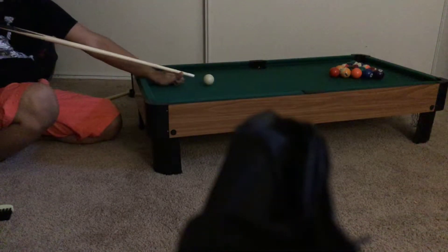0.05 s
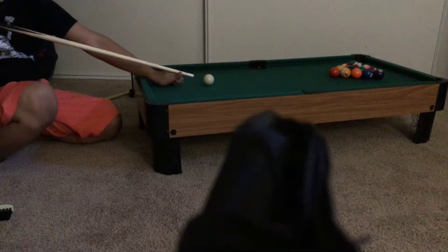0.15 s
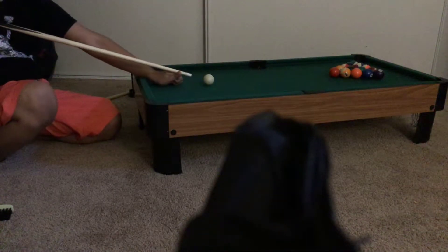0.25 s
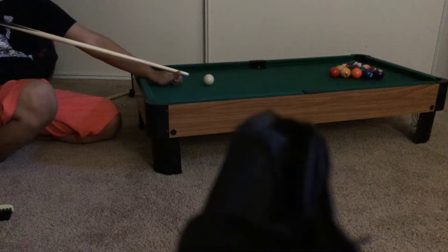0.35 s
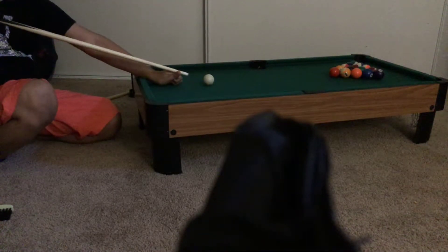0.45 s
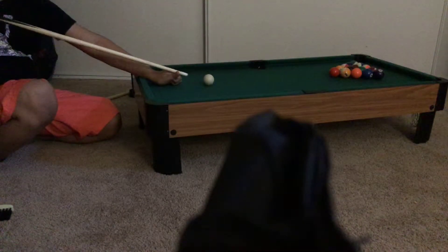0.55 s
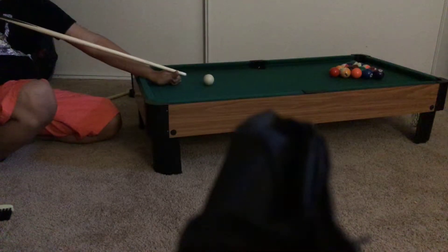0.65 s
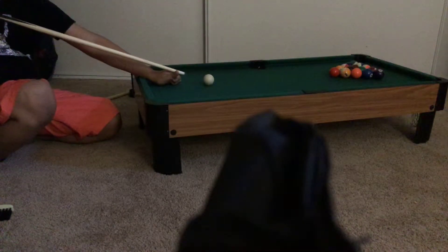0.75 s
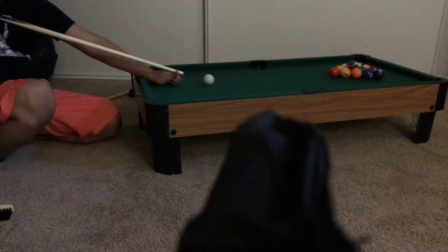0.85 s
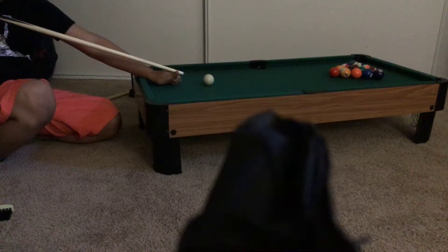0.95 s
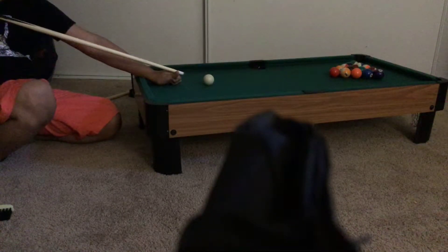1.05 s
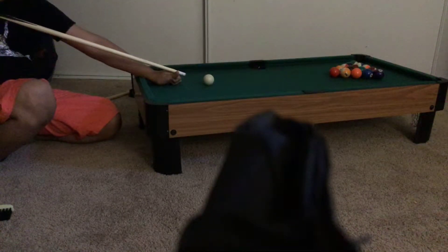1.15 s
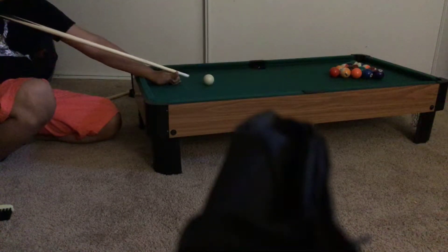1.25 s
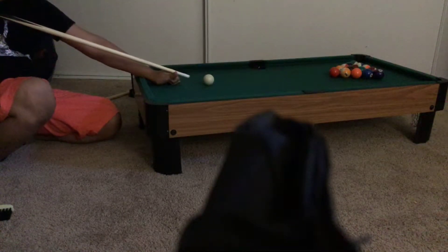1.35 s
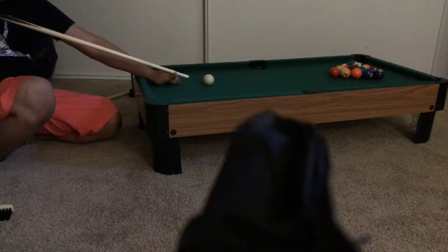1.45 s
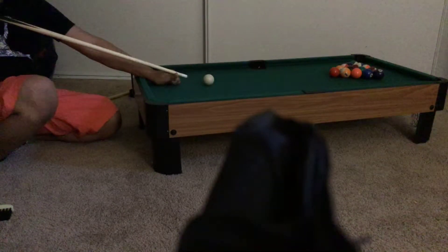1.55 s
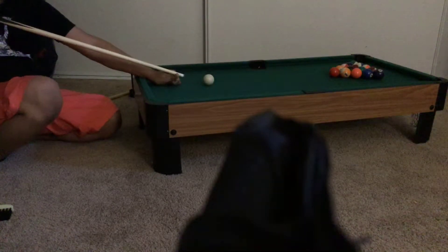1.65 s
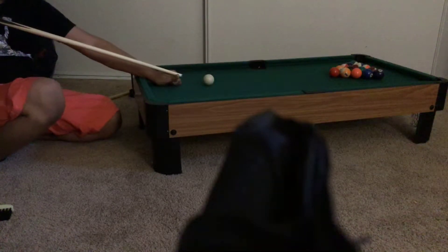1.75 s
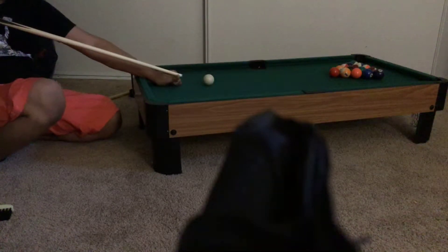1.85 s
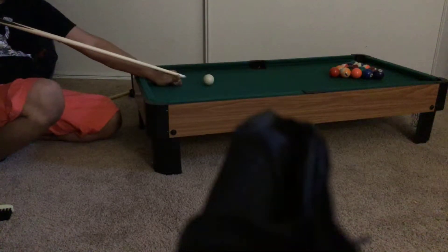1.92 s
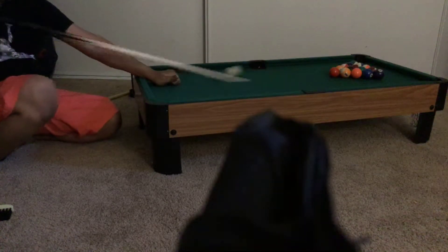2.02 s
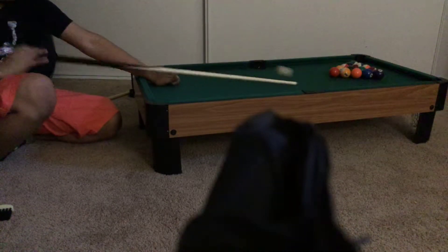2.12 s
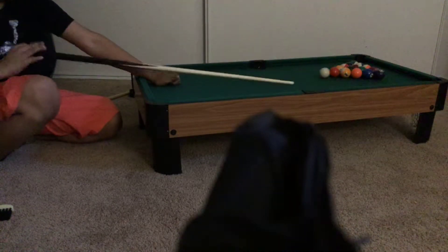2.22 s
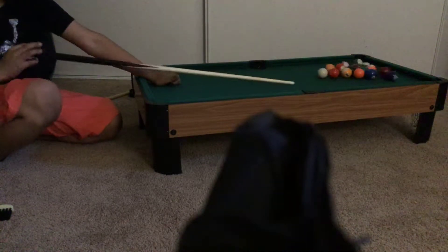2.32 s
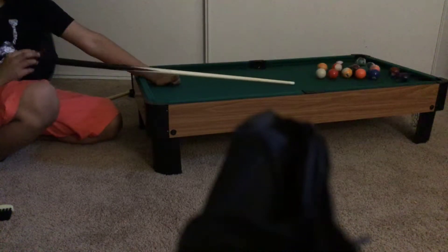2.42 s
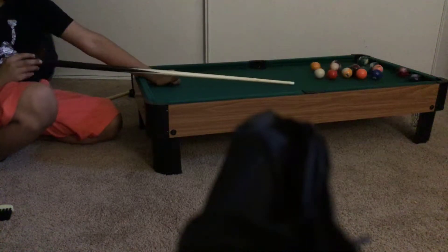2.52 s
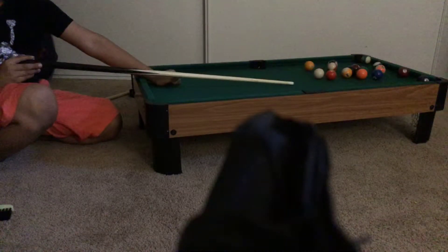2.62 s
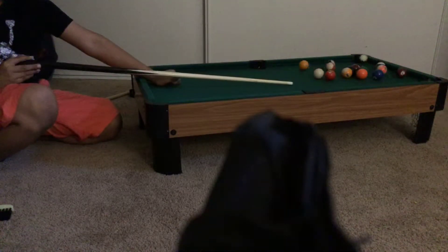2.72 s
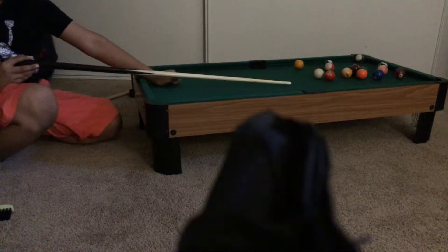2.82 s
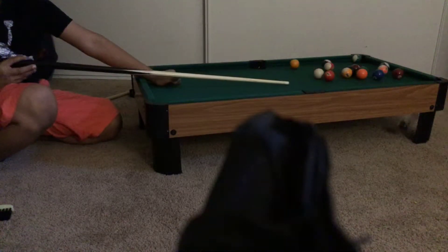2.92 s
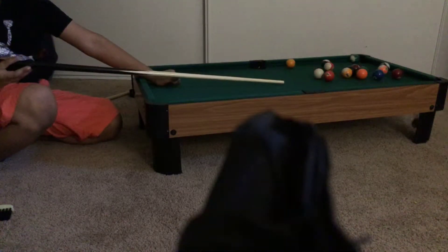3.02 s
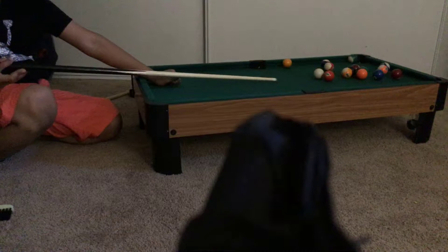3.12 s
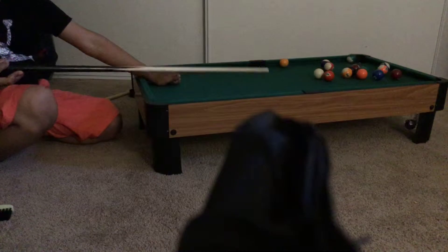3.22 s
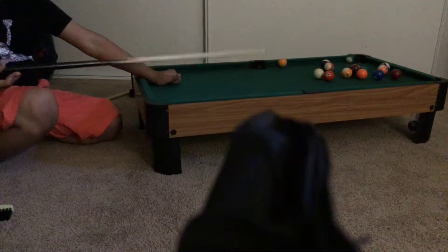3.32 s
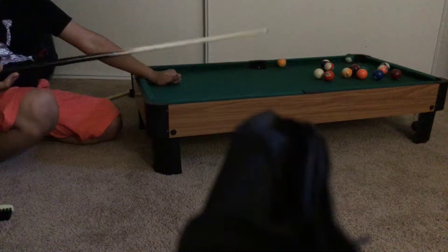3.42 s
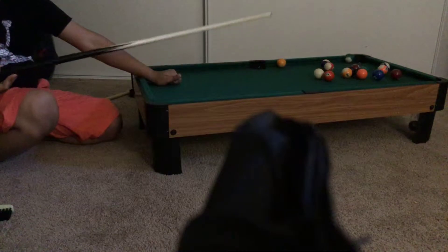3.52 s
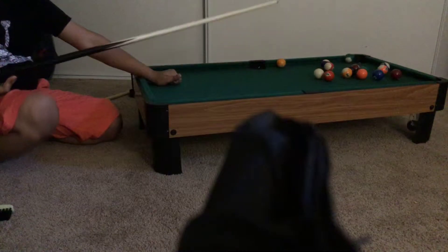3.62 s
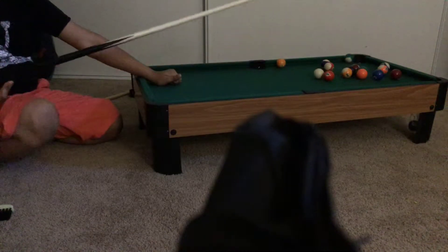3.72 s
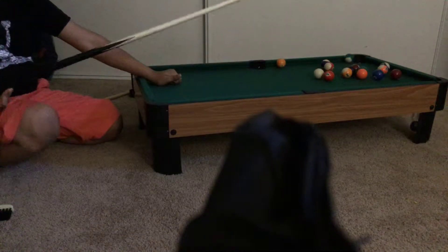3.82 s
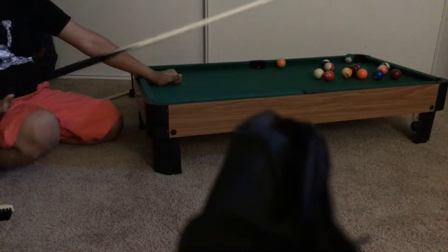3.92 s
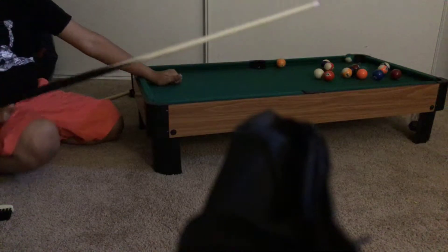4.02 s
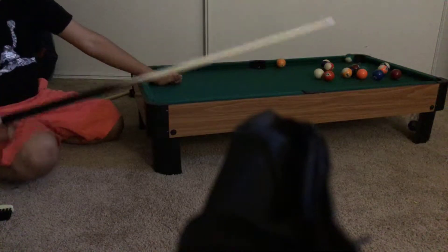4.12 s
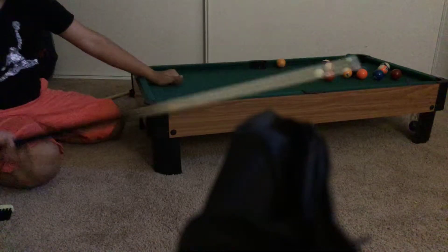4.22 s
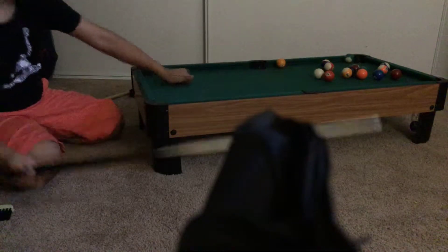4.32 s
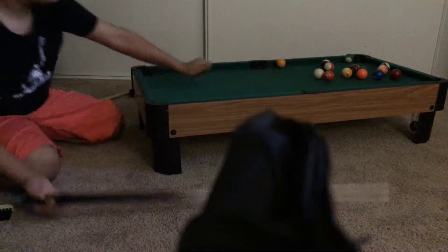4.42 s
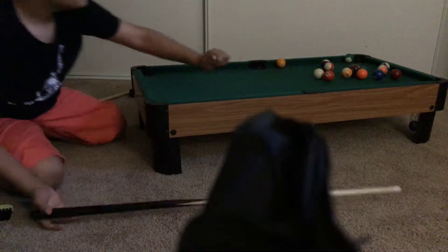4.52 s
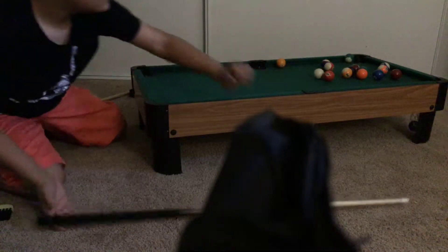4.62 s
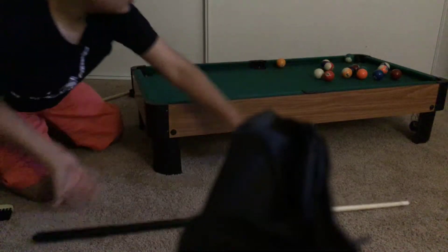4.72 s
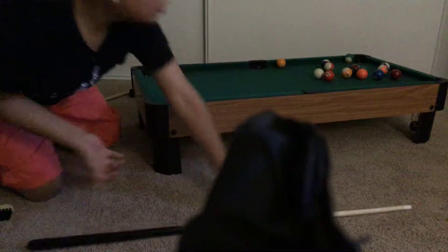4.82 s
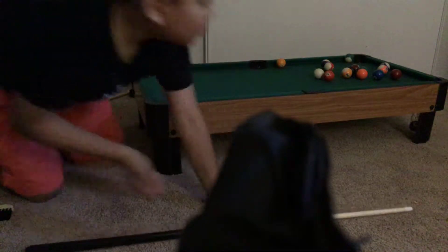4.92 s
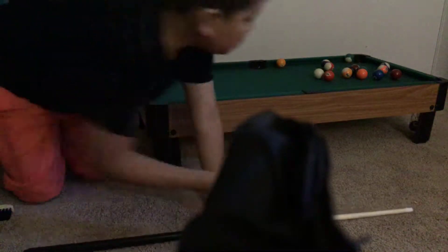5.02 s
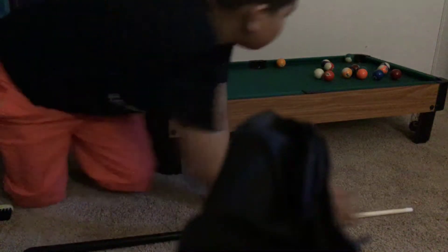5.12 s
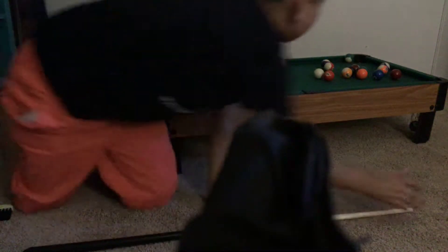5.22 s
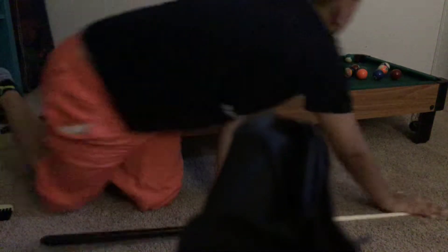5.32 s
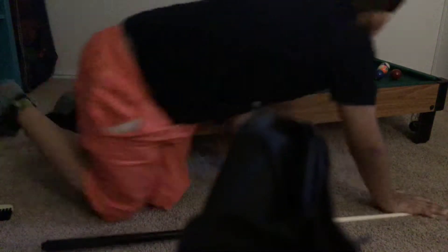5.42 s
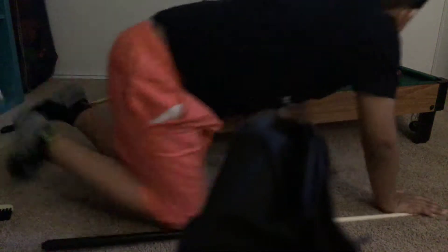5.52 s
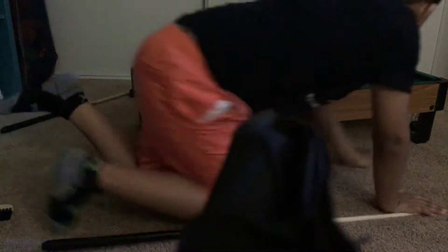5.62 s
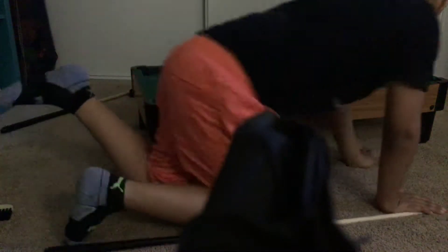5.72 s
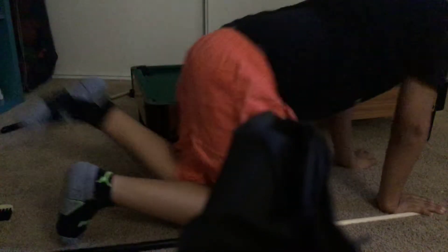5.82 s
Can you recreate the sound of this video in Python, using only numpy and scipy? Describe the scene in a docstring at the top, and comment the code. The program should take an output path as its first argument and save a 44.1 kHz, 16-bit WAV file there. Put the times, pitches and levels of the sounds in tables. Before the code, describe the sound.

Nearly two seconds of hushed indoor air, then a loud, bright cue strike with a boxy table knock, answered a quarter second later by hard, dense ball clacks. Balls roll faintly on felt and knock the wooden rails. Afterwards come quiet fabric swishes, a soft cue drop, tiny faint squeaks and a cluster of dull carpet thuds. Mono, small microphone close to the floor, slightly reverberant room, little deep bass.

```python
"""In a quiet room with air noise and a building rumble, cloth rustles: rubbing noise swelling per movement.
A cue strikes the white ball on a small wooden pool table: a tip snap and dying shaft modes. The table
thumps and knocks as its box modes ring, and racked balls clack as short air pulses; rolling balls rub
the felt. Then the player drops the cue on the carpet and crawls forward: low damped thuds, rustling
cloth, and faint squeaks of narrow-band noise."""
import sys
import numpy as np
from scipy import signal
from scipy.io import wavfile
from scipy.ndimage import uniform_filter1d

SR = 44100
rng = np.random.default_rng(int(sys.argv[2]) if len(sys.argv) > 2 else 0)


def dump_mix(stems):
    """Bounce the given channels to the path in sys.argv[1] as a 16-bit WAV at rate SR."""
    frames = np.atleast_2d(stems).T  # one column per channel
    limited = np.clip(frames, -1, 1)  # hard clip at full scale
    pcm = np.round(limited * 32767).astype(np.int16)
    wavfile.write(sys.argv[1], SR, pcm)


N = 258426


def gain_of(db):
    """Level law: decibels to an amplitude ratio."""
    return 10 ** (np.asarray(db) / 20)


def read(points, hz):
    """Interpolation along a logarithmic frequency axis."""
    point_hz, value = np.transpose(points)
    return np.interp(np.log(hz + 1), np.log(point_hz + 1), value)


def peaked(x):
    """Normalisation to a peak of 1."""
    return x / np.max(abs(x))


def add(mix, start_s, sound):
    """Superposition: a sound is summed in place from its start time."""
    part = mix[round(start_s * SR):][:len(sound)]
    part += sound[:len(part)]


def ring(modes, weight, rise_s):
    """Modal superposition: dying sines swell with a contact time constant; neighbours swing opposite ways."""
    t = np.arange(SR // 2) / SR
    hz, level_db, t60_s = np.transpose(modes)[:, :, None]
    sign = (-1.) ** np.arange(len(modes))[:, None]
    decay = gain_of(level_db - 60 * t / t60_s)
    sines = weight * sign * decay * np.sin(2 * np.pi * hz * t)
    return peaked(sines.sum(0) * (1 - np.exp(-t / rise_s)))


def colour(points):
    """Minimum phase: a causal impulse whose phase follows from its log spectrum."""
    spectrum_db = np.maximum(read(points, np.fft.rfftfreq(4096, 1 / SR)), -100)
    half = np.log(gain_of(spectrum_db))
    full = np.r_[half, half[-2:0:-1]]  # both sides of the spectrum
    return np.fft.ifft(np.exp(np.conj(signal.hilbert(full)))).real[:1024]


def burst(t60_s):
    """Exponential decay of 18 ms of white noise."""
    samples = np.arange(800)
    return rng.standard_normal(800) * gain_of(-60 * samples / SR / t60_s)


def noise(points, patchy_db, size=1024):
    """Short-time synthesis: random spectra with drifting patches of level, rms 1."""
    frames, hz = 4 * N // size + 5, np.fft.rfftfreq(size, 1 / SR)
    real, imag, patches = rng.standard_normal((frames, len(hz), 3)).T
    patches = uniform_filter1d(patches, size=8, axis=0)   # smooth across frequency
    patches = uniform_filter1d(patches, size=10, axis=1)  # smooth along time
    level_db = read(points, hz)[:, None] + patchy_db * patches / patches.std()
    spectra = (real + 1j * imag) * gain_of(level_db)
    x = signal.istft(spectra, nperseg=size, noverlap=size - size // 4)[1][:N]
    return x / x.std()


# spectrum of the room air: pitch_hz [Hz], relative level_db [dB per Hz]
AIR_SPECTRUM = [(180, -30.5), (300, -5), (486, -6), (737, -4.5), (915, -24.5), (1170, -12.5), (1660, -19.5),
                (2070, -17.5), (3640, -27.5), (15000, -44.5), (16000, -50)]
# spectrum of the building rumble: pitch_hz [Hz], relative level_db [dB per Hz]
RUMBLE_SPECTRUM = [(18, -64.5), (30, -28), (46, -16), (70, 5), (102, -2), (119, -5.5), (141, -2),
                   (162, -10), (192, -0.5), (217, -25), (242, -15), (278, -16), (330, -11), (430, -43),
                   (730, -120)]


def room_tone():
    """Stationary noise: room air plus low building rumble, each at a fixed rms level."""
    air_db, rumble_db = -64.5, -54.5
    air = gain_of(air_db) * noise(AIR_SPECTRUM, 1.3)
    rumble = gain_of(rumble_db) * noise(RUMBLE_SPECTRUM, 0.53, size=4096)
    return air + rumble


def swell(top_s, length_s):
    """Asymmetric Gaussian bell of power, rising faster than it falls; length between its 1/e^2 points."""
    t = np.arange(N) / SR - top_s
    rise_share = 0.44  # part of a movement spent swelling
    share = np.where(t < 0, rise_share, 1 - rise_share)
    return np.exp(-2 * (t / length_s / share) ** 2)


# player shifting, stroking, dropping the cue and crawling:
# top_s [s], length_s [s], cloth swish_db [dB], fine fabric hiss_db [dB]
RUSTLE_MOVES = [(0.034, 0.19, -68.5, -74.5), (1.35, .2, -93, -85), (1.71, 0.15, -79, -86),
                (2.086, 0.17, -73, -78), (3.333, .22, -86, -87), (3.764, .15, -77, -82),
                (3.92, .18, -78.5, -85), (4.22, .15, -75.5, -84), (4.416, 0.17, -68, -75.5),
                (4.68, 0.33, -63.5, -76), (5.09, 0.42, -65, -78), (5.36, 0.18, -66, -75),
                (5.453, 0.11, -59.5, -62), (5.513, .1, -65.5, -84), (5.59, 0.12, -63.5, -68.5),
                (5.664, 0.15, -63, -72), (5.83, 0.22, -66, -71)]
# a player keeping still: drag_db, swish_db, hiss_db [dB]
STILL_LEVELS = (-61, -87, -100)
# balls rolling over the felt: top_s [s], length_s [s], drag_db, swish_db, hiss_db [dB]
FELT_ROLL = (3, 0.85, -64.5, -72, -82.5)
# spectra of rubbing, low drag, cloth swish, fine hiss: pitch_hz [Hz], relative level_db [dB per Hz]
DRAG_SPECTRUM = [(60, -32.5), (150, 11.5), (300, 1.5), (700, -3.5), (1200, -14), (2500, -48.5)]
SWISH_SPECTRUM = [(500, -32), (900, -6.5), (1500, -6), (2500, -7), (4000, -11), (6500, -17.5), (9000, -28),
                  (12000, -53.5)]
FINE_SPECTRUM = [(4410, -44), (7500, -9.5), (8650, -15.5), (9390, -4.5), (13400, -1.5), (14700, 3.5),
                 (16000, -5.5)]


def moves():
    """Friction noise: powers of movements and rolling add; fibres catch, so swish and hiss flicker."""
    drag_over_swish_db = 6  # limbs drag along with the cloth
    still_power = gain_of(STILL_LEVELS)[:, None] ** 2
    roll_power = gain_of(FELT_ROLL[2:])[:, None] ** 2 * swell(*FELT_ROLL[:2])
    power = still_power + roll_power
    for top_s, length_s, swish_db, hiss_db in RUSTLE_MOVES:
        levels_db = [[swish_db + drag_over_swish_db], [swish_db], [hiss_db]]
        power = power + gain_of(levels_db) ** 2 * swell(top_s, length_s)
    catch = uniform_filter1d(rng.standard_normal(N), size=300)
    catch = gain_of(1.5 * catch / catch.std())
    drag = noise(DRAG_SPECTRUM, 2.5)
    swish = catch * noise(SWISH_SPECTRUM, 0.77)
    hiss = catch * noise(FINE_SPECTRUM, 1.4, size=256)
    return (np.sqrt(power) * (drag, swish, hiss)).sum(0)


# cue tip meeting the ball, then the shaft chattering:
# start_s [s], level_db [dB, reference for the layers below]
CUE_HITS = [(2.1085, -14), (2.1129, -20), (2.1325, -28.5)]
# modes of the cue stick: pitch_hz [Hz], relative level_db [dB], t60_s [s]
SHAFT_MODES = [(1600, -3.5, 0.052), (2038, -2, 0.03), (2620, -1, 0.035), (3268, -1.5, 0.025),
               (3540, -7.5, 0.032), (4257, -15, .03), (4887, -3, 0.023), (5030, -6.5, 0.045),
               (6290, -11, 0.027)]
# snap of the tip: pitch_hz [Hz], relative level_db [dB per Hz]
TIP_SPECTRUM = [(500, -44), (1000, -16.5), (2000, -4.5), (3000, 3), (5000, -5.5), (7000, -12), (9500, -22),
                (13000, -21.5), (16000, -27.5)]


def cue():
    """Impact excitation: the tip snaps, the shaft rings at its modes, and the tip's leather scuffs on."""
    stick, scuff = np.zeros((2, N))
    snap = peaked(colour(TIP_SPECTRUM))
    for start_s, level_db in CUE_HITS:
        add(stick, start_s, gain_of(level_db - 0.5) * snap)
        add(stick, start_s, gain_of(level_db - 10.0) * ring(SHAFT_MODES, 1, 0.00032))
        add(scuff, start_s, gain_of(level_db - 6.0) * peaked(np.convolve(burst(0.03), snap)))
    return stick, scuff


# decay of the room: pitch_hz [Hz], t60_s [s]
WALL_DECAY = [(150, .35), (400, 0.25), (1000, 0.29), (3000, 0.29), (7000, 0.33), (14000, 0.15)]


def room(x):
    """Reverberation: sparse taps of random sign, each band dying at its own speed, total energy 1."""
    taps = np.zeros(SR // 2)
    at = np.arange(120, len(taps) - 20, 20)
    taps[at + rng.integers(0, 20, len(at))] = rng.choice([-1., 1.], len(at))
    hz, t, bands = signal.stft(taps, SR, nperseg=256)
    decay = gain_of(-60 * t / read(WALL_DECAY, hz)[:, None])
    tail = signal.istft(bands * decay, SR, nperseg=256)[1]
    return signal.fftconvolve(x, tail / np.linalg.norm(tail))[:N]


# parts of the knocks on the table, several rows may form one knock:
# start_s [s], peak level_db [dB], pitch_hz at the centre of the modes set ringing [Hz],
# spread [octaves], lasting [factor on ring time], crack_db [dB relative to level_db]
KNOCK_PARTS = [(2.113, -12.5, 240, 0.52, 0.46, -9), (2.114, -13, 353, 0.18, 0.36, -23.5),
               (2.143, -18.5, 357, 0.44, 1.4, -23), (2.150, -25, 230, .4, 0.89, -10.5),
               (2.279, -16, 222, 0.31, 0.3, 2), (2.288, -16.5, 487.6, .25, 0.56, -10.5),
               (2.325, -23.5, 216, 0.43, 1.4, -10), (2.704, -41, 211.5, 0.81, 1.5, -17),
               (2.9003, -25.5, 743, 0.53, 0.46, 2.5), (2.907, -22, 355, 0.46, 0.63, -12),
               (2.914, -23.5, 470, 0.64, 0.86, -17), (3.161, -27.5, 238, 0.21, 0.52, -24.5),
               (3.194, -42.5, 255.7, 0.3, 0.33, -22.5), (3.229, -46, 237.3, 0.14, 0.41, -27)]
# modes of the wooden box: pitch_hz [Hz], relative level_db [dB], t60_s [s, before the factor of each part]
TABLE_MODES = [(122.3, -12.5, .15), (157.9, -5.5, .15), (203.3, 0.5, 0.093), (245, 6, 0.07),
               (268.8, -2, 0.16), (347, -1.5, 0.21), (379, 0, .1), (455, -5, 0.054), (561, -3.5, 0.15),
               (624, -7.5, 0.13), (690, 1.5, 0.07), (768, -6, 0.12), (833, 1, .1), (960, -7.5, 0.1106),
               (1074, -7, .1), (1280, -6.5, 0.13), (1240, -2, 0.13), (1480, -11.5, .1)]
# crack of a knock part: pitch_hz [Hz], relative level_db [dB per Hz]
WOOD_SPECTRUM = [(100, -34.5), (450, 3), (800, -1.5), (1150, 0.5), (2000, -8), (4500, -20), (6000, -30.5),
                 (7500, -41), (9500, -43.5), (13000, -43.5), (16000, -45)]


def knocks():
    """Selective modal excitation: each part rings nearby modes and cracks; the joints of the box buzz on."""
    body, crack, buzz = np.zeros((3, N))
    wood = peaked(colour(WOOD_SPECTRUM))
    modes = np.array(TABLE_MODES)
    for start_s, level_db, hz, spread, lasting, crack_db in KNOCK_PARTS:
        near = np.exp(-.5 * (np.log2(modes[:, :1] / hz) / spread) ** 2)
        thump = ring(modes * [1, 1, lasting], near, 0.39 / hz)
        rattle = peaked(np.convolve(burst(0.04), wood))
        add(body, start_s, gain_of(level_db) * thump)
        add(crack, start_s, gain_of(level_db + crack_db) * wood)
        add(buzz, start_s, gain_of(level_db + crack_db - 3.0) * rattle)
    return body, crack, buzz


# ball on ball: start_s [s], peak level_db of the pulse [dB], pitch_hz [Hz], click_db [dB relative to level_db]
BALL_CLACKS = [(2.3526, -9.5, 3195, 2.5), (2.3545, -12, 3230, -7), (2.3559, -10.5, 3933, -8),
               (2.361, -19, 4395, -13.5), (2.3623, -24.5, 3930, -10.5), (2.3655, -18.5, 4000, -12.5),
               (2.3737, -18.5, 3220, -13.5), (2.383, -20.5, 4140, -14.5)]
# broad click: pitch_hz [Hz], relative level_db [dB per Hz]
CLICK_SPECTRUM = [(600, -41), (1100, -19.5), (1500, -7.5), (2100, -8), (3200, -4), (4100, 2.5), (6600, -10),
                  (8500, -28.5), (10000, -35), (13000, -30.5), (16000, -33.5)]


def clacks():
    """Acceleration noise: hard balls give a few cycles of air pulse each, on a broad click."""
    out, click, t = np.zeros(N), peaked(colour(CLICK_SPECTRUM)), np.arange(400) / SR
    for start_s, level_db, hz, click_db in BALL_CLACKS:
        pulse = peaked(t * np.exp(-t / 0.00032) * np.sin(2 * np.pi * hz * t))
        add(out, start_s, gain_of(level_db) * pulse)
        add(out, start_s, gain_of(level_db + click_db) * click)
    return out


# cue, hand and knee landing on the carpet: start_s [s], peak level_db [dB], pitch_hz [Hz], t60_s [s],
# tick_db of the fibres [dB gain on filtered noise]
CARPET_THUDS = [(4.579, -30, 288, 0.051, -64), (5.424, -30, 197.5, 0.025, -71),
                (5.432, -29, 247, 0.028, -78), (5.447, -36.5, 191, 0.045, -53.5),
                (5.44, -37, 48, 0.25, -78), (5.469, -33, 87.5, 0.066, -57)]


def thuds():
    """Damped impact: soft low pushes with two overtones, and a thin tick of the fibres."""
    out = np.zeros(N)
    fibres = peaked(colour(FINE_SPECTRUM))
    for start_s, level_db, hz, t60_s, tick_db in CARPET_THUDS:
        modes = [(hz, 0, t60_s), (2.52 * hz, -14, 0.23 * t60_s), (4 * hz, -18, 0.49 * t60_s)]
        add(out, start_s, gain_of(level_db) * ring(modes, 1, 0.00098))
        add(out, start_s, gain_of(tick_db) * np.convolve(burst(0.028), fibres))
    return out


# faint squeaks while the player shifts:
# start_s [s], end_s [s], pitch_hz [Hz], width_hz [Hz], level_db [dB rms, before the fade window]
FAINT_SQUEAKS = [(4.657, 4.88, 4070, 60, -73), (4.699, 4.843, 3250, 60.5, -75),
                 (5.338, 5.418, 2640, 60, -67)]


def squeaks():
    """Resonant filtering: narrow bands of noise that swell and fade."""
    out = np.zeros(N)
    for start_s, end_s, hz, width_hz, level_db in FAINT_SQUEAKS:
        size = round((end_s - start_s) * SR)
        b, a = signal.iirpeak(hz, hz / width_hz, SR)
        tone = signal.lfilter(b, a, rng.standard_normal(SR // 2))[-size:]  # the settled end
        add(out, start_s, gain_of(level_db) * tone / tone.std() * np.hanning(size))
    return out


def scene():
    """Superposition of direct sound, reverberation, rubbing noise, squeaks and room tone."""
    stick, scuff = cue()
    body, crack, buzz = knocks()
    balls, soft = clacks(), thuds()
    direct = body + crack + buzz + stick + scuff + balls + soft
    # buzz and scuff are heard only directly
    sent = gain_of(8.5) * stick + gain_of(-3.5) * body + gain_of(8.5) * crack
    sent = sent + gain_of(-1.0) * balls + gain_of(-7.0) * soft
    return (room_tone() + moves() + direct + room(sent) + squeaks())[None]


def record(dry):
    """Band limiting: the small microphone drops the deep bass, then a steep low-pass cuts the top."""
    bass_hz, edge_hz = 45., 15850
    thin = signal.sosfilt(signal.butter(3, bass_hz, "high", fs=SR, output="sos"), dry)
    low_pass = signal.firwin(511, edge_hz, window=("kaiser", 9), fs=SR)
    return signal.oaconvolve(thin, low_pass[None], "same")


dry = scene()
out = record(dry)
dump_mix(out)
```